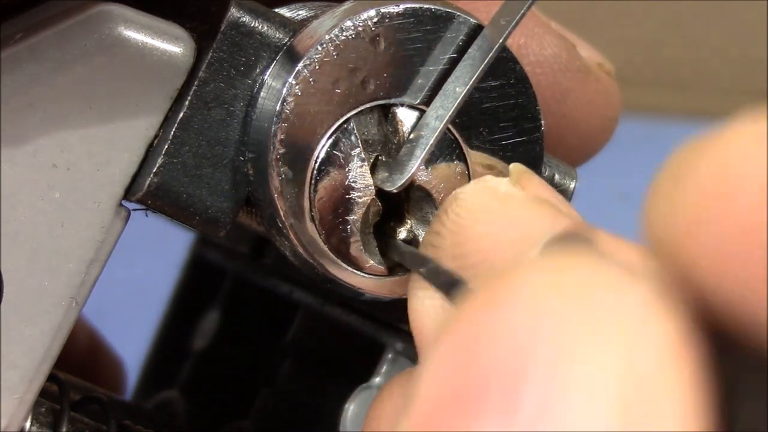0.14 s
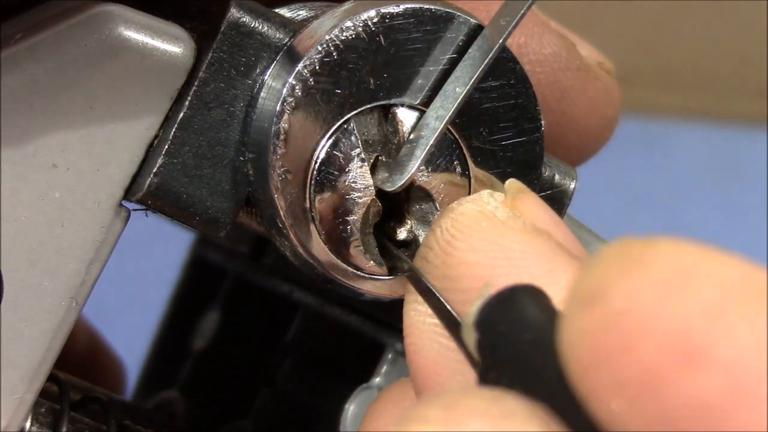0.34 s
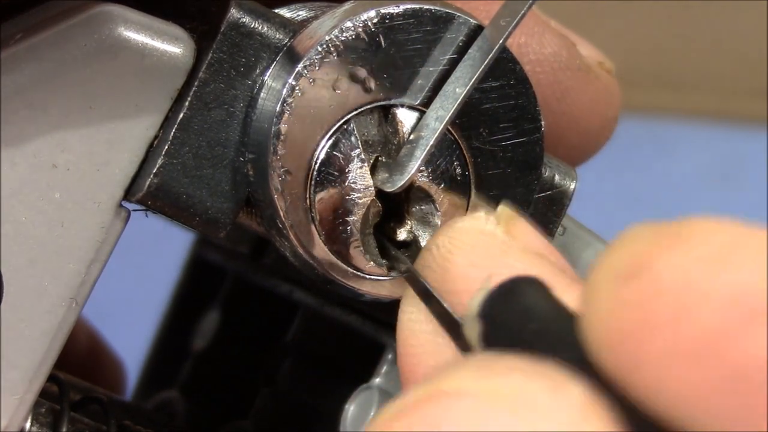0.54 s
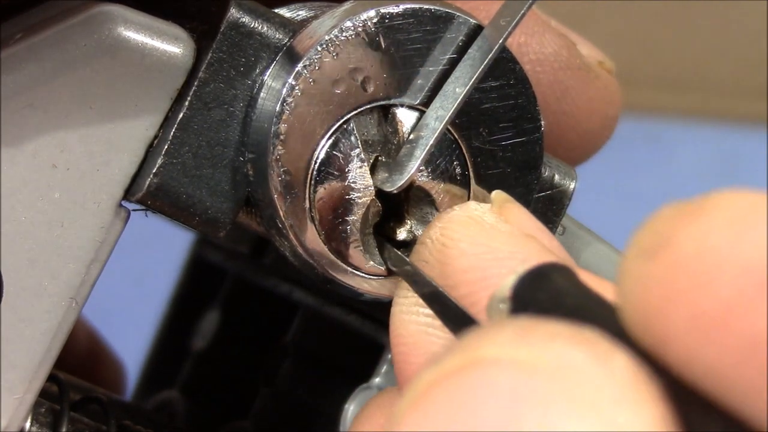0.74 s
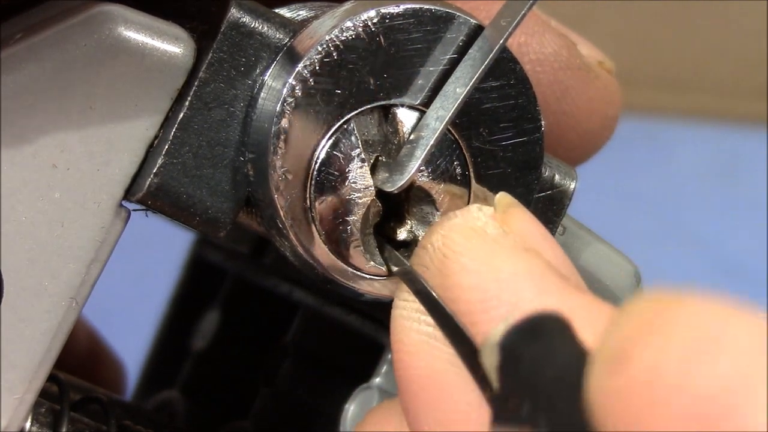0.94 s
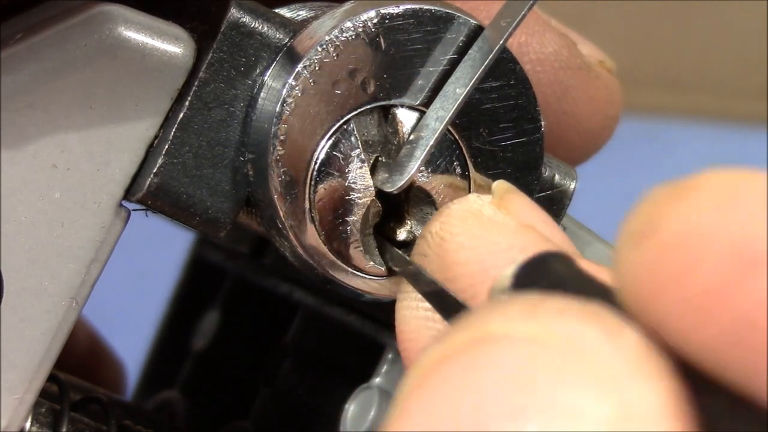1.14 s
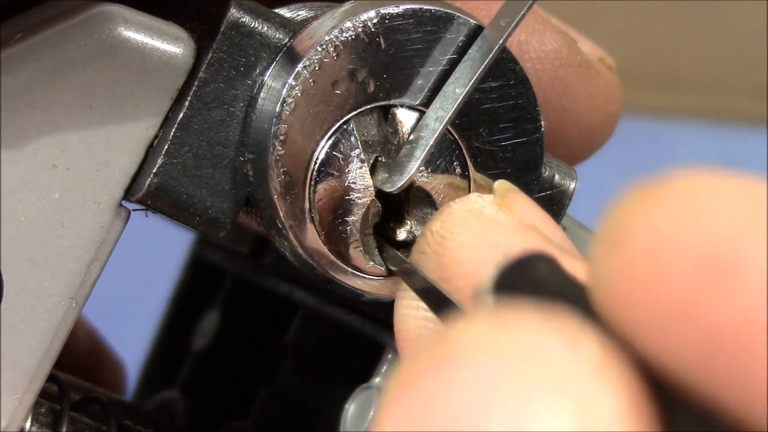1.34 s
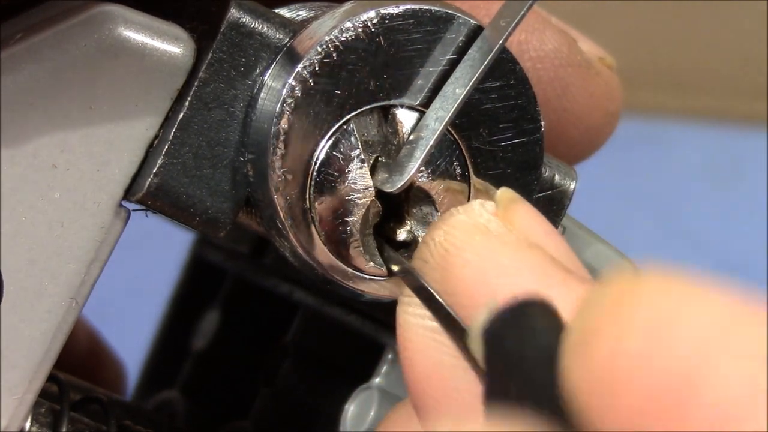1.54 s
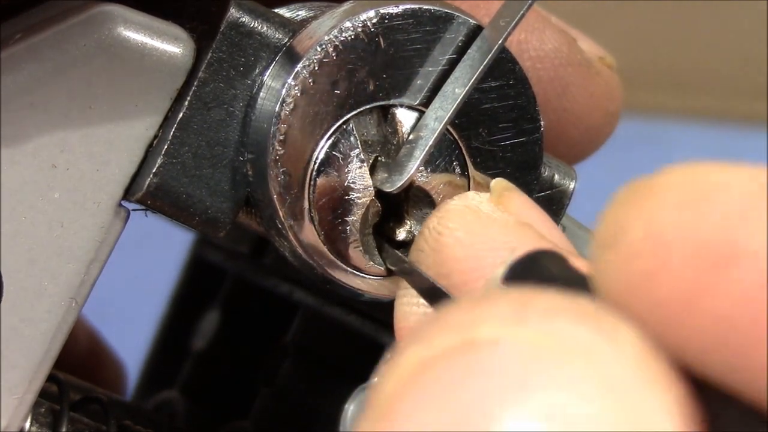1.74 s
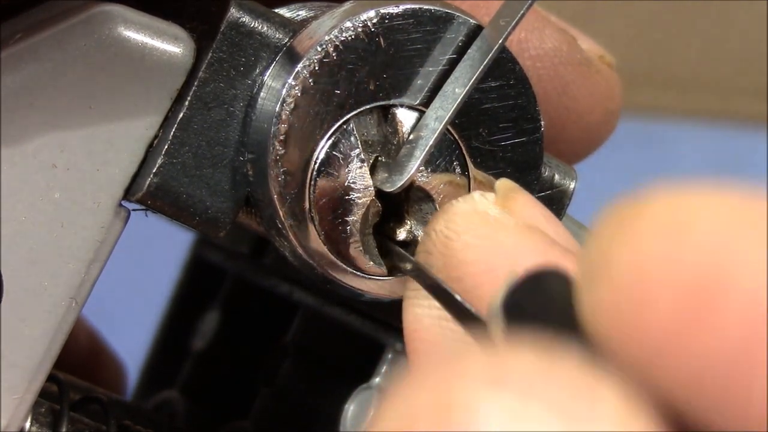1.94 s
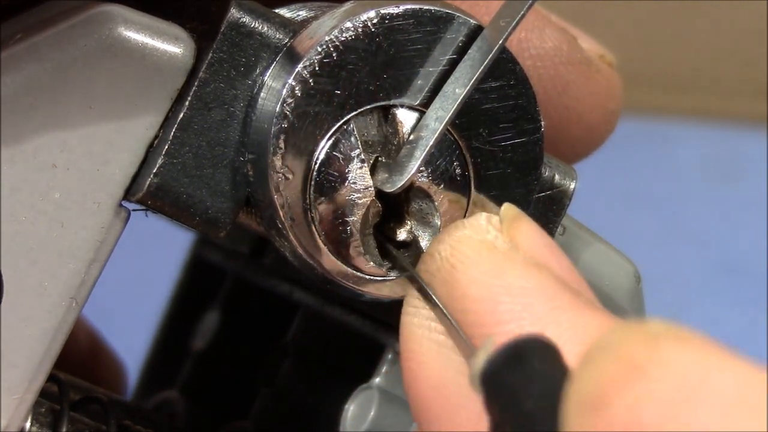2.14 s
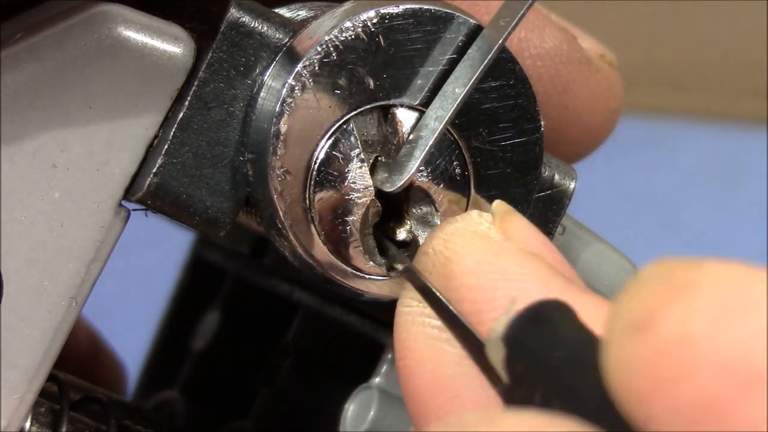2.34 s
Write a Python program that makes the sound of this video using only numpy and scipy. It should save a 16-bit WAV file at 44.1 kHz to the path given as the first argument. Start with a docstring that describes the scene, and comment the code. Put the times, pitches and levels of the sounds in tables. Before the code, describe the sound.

Lock picking, heard very close in a small quiet room. Tiny ticks lead to a loud, bright metallic snap at 0.2 s. Lighter clicks follow at 0.45 and 0.56 s, then faint ones around 1.1-1.25 s and 1.9 s. Two hard clicks strike at 2.1 s, trailed by faint ticks. Soft vise thumps, short room tails, an early fading wash and faint steady hum lie underneath.

```python
"""From the start a faint mains hum, soft room noise and low rumble lie under a wash that dies away.
Then a thin steel pick clicks over the pins of a lock held in a vise, close to a camera in a small room.
Each click is a damped tick of pick and pin with a sharp edge, and a modal knock in the lock body.
Low modes of the vise thump under hard clicks and under the fingers.
After each blow the room answers with a decaying stereo noise tail."""
import sys
import numpy as np
from scipy import signal
from scipy.fft import rfft, irfft, next_fast_len
from scipy.io import wavfile

SR = 44100
rng = np.random.default_rng(int(sys.argv[2]) if len(sys.argv) > 2 else 0)


def output_pcm(signal):
    """Save a mono or channel-first signal as 16-bit PCM at the path in sys.argv[1].

    Samples are clipped to [-1, 1] before scaling.
    """
    pcm = np.clip(np.atleast_2d(signal).T, -1, 1) * 32767
    wavfile.write(sys.argv[1], SR, np.round(pcm).astype(np.int16))


def ratio_of_db(decibels):
    """Turn decibels (scalar or array-like) into linear amplitude factors; 0 dB maps to 1."""
    return 10 ** (np.asarray(decibels, float) / 20)


N = 105840


def unit(x):
    """Normalization: scale a signal to rms 1."""
    return x / np.sqrt(np.mean(x ** 2) + 1e-20)


def along(points, hz):
    """Logarithmic interpolation: read a (f/Hz, value) curve on a log frequency axis."""
    f, value = np.transpose(points)
    return np.interp(np.log(hz + 1), np.log(f + 1), value)


def filtered(x, response):
    """Linear filtering: multiply the spectrum of x by a response of frequency."""
    m = next_fast_len(x.shape[-1] + SR // 4)  # padded against wrap-around
    spectrum = rfft(x, m) * response(np.fft.rfftfreq(m, 1 / SR))
    return irfft(spectrum, m)[..., :x.shape[-1]]


def stereo_noise(spectrum, alike):
    """Interchannel coherence: shaped mid and side noise, mixed for a given likeness, at rms 1."""
    def mid_side_response(hz):
        angle = np.arccos(np.clip(along(alike, hz), -1, 1)) / 2
        return ratio_of_db(along(spectrum, hz)) * [np.cos(angle), np.sin(angle)]

    mid, side = filtered(rng.standard_normal((2, N)), mid_side_response)
    return unit(np.array([mid + side, mid - side]))


# mains harmonics: f/Hz, rms level/dB
HUM_TONES = [(100, -71.5), (200, -78)]


def hum():
    """Harmonic series: steady sines at multiples of the mains frequency, in random phase."""
    t = np.arange(N) / SR
    tones = [np.sqrt(2) * ratio_of_db(db) * np.sin(2 * np.pi * (hz * t + rng.random())) for hz, db in HUM_TONES]
    return sum(tones)


# spectrum of the soft room noise: f/Hz, relative density level/dB per Hz
AIR_SPECTRUM = [(60, -61.5), (110, -2.5), (140, -7), (190, -4.5), (300, -5), (800, -10), (1500, -16),
                (4300, -22), (9000, -29), (12500, -35), (13500, -35), (15500, -51.5), (16300, -73.5),
                (22000, -120)]
# coherence of the soft room noise: f/Hz, left-right likeness
AIR_ALIKE = [(60, 0.67), (180, 0.78), (550, 0.38), (1650, 0.68), (4970, 0.69), (15000, 0.76)]
AIR_DB = -67.5  # rms


def air():
    """Stationary random noise: a fixed spectrum with partly coherent channels."""
    return ratio_of_db(AIR_DB) * stereo_noise(AIR_SPECTRUM, AIR_ALIKE)


# spectrum of the low rumble: f/Hz, relative density level/dB per Hz
RUMBLE_SPECTRUM = [(15, -14), (40, -5), (80, -3.5), (115, 0.5), (140, -21.5), (200, -85)]
RUMBLE_DB = -88  # rms


def rumble():
    """Low-frequency random noise: most of its power lies near and below 115 Hz."""
    return ratio_of_db(RUMBLE_DB) * stereo_noise(RUMBLE_SPECTRUM, [(30, .5), (100, 0.56)])


# spectrum of the wash: f/Hz, relative density level/dB per Hz
WASH_SPECTRUM = [(80, -42.5), (150, 0.5), (250, 2.5), (400, 2), (900, -3), (1300, -4.5), (12000, -28.5),
                 (15600, -52.5), (22000, -120)]
WASH_DB, WASH_T60_S = -60.5, 1.2  # level before the decay, decay time


def wash():
    """Exponential decay: shaped noise whose level falls linearly in dB from the start."""
    t = np.arange(N) / SR
    return ratio_of_db(WASH_DB - 60 * t / WASH_T60_S) * stereo_noise(WASH_SPECTRUM, [(100, .8)])


SCATTER_DB, PHASE_SCATTER_RAD = 1.5, .7  # standard deviations from blow to blow


def ring(modes, t, rise_s):
    """Modal superposition: damped sines with a short rise, excited a little differently by each blow."""
    hz, db, t60 = np.transpose(modes)[:, :, None]
    luck = rng.standard_normal((len(hz), 2))
    level = db + SCATTER_DB * luck[:, :1] - 60 * t / t60
    phase = PHASE_SCATTER_RAD * luck[:, 1:]
    waves = ratio_of_db(level) * np.sin(2 * np.pi * hz * t + phase)
    return waves.sum(0) * (1 - np.exp(-t / rise_s))


TICK_RISE_S = .00015
TICK_BEND = 1.3  # above 1 the tick holds a few cycles, then drops


def tick(t, hz, t60):
    """Damped oscillation: one sine of pick and pin with a fast rise and a bent decay."""
    swell = 1 - np.exp(-t / TICK_RISE_S)
    return 1.6 * swell * ratio_of_db(-60 * (t / t60) ** TICK_BEND) * np.sin(2 * np.pi * hz * t)


# upper ring of the pick: f/Hz, relative level/dB, t60/s
PICK_MODES = [(5050, -22, 0.0097), (5900, -21.5, 0.016), (7600, -25, 0.01459), (9500, -11, 0.0047),
              (10070, -20.5, .006), (11296, -23, 0.0055), (14300, -24.5, .004), (15400, -15.5, 0.0036)]
CRACK_DB, CRACK_T60_S = -8, .004
CRACK_BAND_HZ = [3230, 13500]


def sharp_edge(t):
    """Broadband impact excitation: upper modes of the pick with a short crack of noise."""
    high = signal.butter(2, CRACK_BAND_HZ, "band", fs=SR, output="sos")
    noise = signal.sosfilt(high, rng.standard_normal(len(t)))
    crack = ratio_of_db(CRACK_DB - 60 * t / CRACK_T60_S) * noise
    return ring(PICK_MODES, t, .0001) + crack


# modes of the lock body: f/Hz, relative level/dB, t60/s
BODY_MODES = [(480, -7, .03), (690, -8, .03), (990, -2, .024), (1125, -3, .026), (1375, -11, .035),
              (1850, -5, .02), (2350, -3, .022), (3290, -3, .016), (3900, -8, .015), (4550, -7, .012)]
BODY_RISE_S = .0006
KNOCK_FALL_DB = 3.5  # loss of a body mode one octave off the centre
RATTLE_DB, RATTLE_T60_S = 2, 0.013
RATTLE_OCTAVES = .8  # reach of the noise band to either side of the centre


def knock(t, centre_hz):
    """Selective modal excitation: body modes near a centre dominate, with rattling noise around it."""
    body = [(hz, db - KNOCK_FALL_DB * np.log2(hz / centre_hz) ** 2, t60) for hz, db, t60 in BODY_MODES]
    edges_hz = centre_hz * 2. ** (RATTLE_OCTAVES * np.array([-1, 1]))
    band = signal.butter(2, edges_hz, "band", fs=SR, output="sos")
    noise = unit(signal.sosfilt(band, rng.standard_normal(len(t))))
    rise = 1 - np.exp(-t / BODY_RISE_S)
    rattle = ratio_of_db(RATTLE_DB - 60 * t / RATTLE_T60_S) * rise * noise
    return ring(body, t, BODY_RISE_S) + rattle


# clicks of the pick on the pins: t/s, tick level/dB, tick f/Hz, tick t60/s,
# sharp edge against the tick level/dB, knock level/dB, knock centre f/Hz
PIN_CLICKS = [(0.1142, -47, 7450, .003, 2, -58, 3000), (0.1779, -41, 6980, 0.0014, 0, -50.5, 2514),
              (0.1865, -48.5, 7500, .002, 5.5, -55, 2300), (.2055, 0.5, 6870, 0.0022, -2, -25.5, 1160),
              (0.4493, -34, 7400, 0.0011, -15, -43.5, 2480), (.5595, -25.5, 7550, 0.0011, 3, -32.5, 1400),
              (.5786, -39, 6570, 0.0021, 2.5, -52.5, 4410), (1.0721, -30.5, 7230, 0.0018, -4, -51, 4020),
              (1.0829, -57.5, 6000, .002, -2, -65.5, 4000), (1.1981, -34.5, 8400, .0015, 8, -45.5, 2160),
              (1.2533, -48, 9700, 0.0015, 0, -50.5, 1730), (1.9, -42.5, 7560, 0.0013, 1.5, -76.5, 2978),
              (1.9008, -57.5, 4010, 0.0023, -5, -47.5, 2130), (2.1050, -10, 6600, 0.00092, -4.5, -25, 1570),
              (2.1289, -1.5, 6490, 0.001, -4.5, -29, 2640), (2.1790, -51, 7500, 0.0023, 1, -65, 3270),
              (2.217, -66, 6000, .002, -3.5, -56.5, 1790), (2.2890, -42, 6000, 0.0017, -8.5, -57, 1880),
              (2.325, -61, 7000, 0.0025, 9.5, -66, 3000)]


def clicks(t):
    """Coupled bodies: one impact sounds pick and lock, each click in its own mix."""
    blows = []
    for s, tick_db, tick_hz, tick_t60, edge_db, knock_db, centre_hz in PIN_CLICKS:
        pick = tick(t, tick_hz, tick_t60) + ratio_of_db(edge_db) * sharp_edge(t)
        blows.append((s, ratio_of_db(tick_db) * pick + ratio_of_db(knock_db) * knock(t, centre_hz)))
    return blows


# modes of the vise: f/Hz, relative level/dB, t60/s
VISE_MODES = [(123.27, -7, 0.029), (155, -4, 0.035), (205, 0, .055), (235, 3, 0.046), (335, 0, 0.037),
              (425, -7, 0.032)]
# shakes of the vise under hard clicks and under the fingers: t/s, level/dB, rise/s
VISE_THUMPS = [(.12, -49, .01), (.206, -37.5, 0.0037), (0.477, -58, .01), (0.559, -51, 0.0021),
               (0.577, -53, .004), (1.073, -60, 0.0032), (1.106, -55, 0.007), (1.199, -54, 0.002),
               (1.254, -56.5, .003), (1.524, -47.5, .01), (1.545, -56.5, 0.004), (1.589, -65.5, 0.0088),
               (1.901, -59, 0.001), (2.107, -36.5, 0.0031), (2.1305, -35, .003), (2.188, -53, 0.011),
               (2.29, -57, 0.0015)]


def thumps(t):
    """Low modal response: the vise rings down after each shake, with its own rise time."""
    return [(s, ratio_of_db(db) * ring(VISE_MODES, t, rise_s)) for s, db, rise_s in VISE_THUMPS]


# decay of the room: f/Hz, t60/s
ROOM_DECAY = [(150, 0.6), (400, 0.74), (1000, 0.51), (2800, 0.21), (7300, 0.14), (15000, 0.22)]
# colour of the room: f/Hz, relative level/dB
ROOM_COLOUR = [(200, -2), (700, 2), (1200, 0), (4000, 1), (7000, -1), (10000, -4), (12000, -2),
               (15000, -10)]
ROOM_DB, ROOM_GAP_S, ROOM_ALIKE = -18, .003, .8  # tail level, delay, left-right likeness


def room(x):
    """Reverberation: convolution with a fresh noise tail in which each frequency dies at its own speed."""
    hz, t, z = signal.stft(rng.standard_normal((2, SR // 2)), SR, nperseg=256)
    decay_db = 60 * t / along(ROOM_DECAY, hz)[:, None]
    z = z * ratio_of_db(along(ROOM_COLOUR, hz)[:, None] - decay_db)
    mid, side = signal.istft(z, SR, nperseg=256)[1]
    angle = np.arccos(ROOM_ALIKE) / 2
    tail = np.cos(angle) * mid + np.sin(angle) * np.array([side, -side])
    late = np.pad(x, (round(ROOM_GAP_S * SR), 0))[None]
    return ratio_of_db(ROOM_DB) * signal.fftconvolve(late, tail / np.linalg.norm(mid), axes=1)


# level difference of the direct sound: f/Hz, left over right level/dB
LEFT_OVER_RIGHT = [(200, -0.5), (600, 1.5), (1500, -0.46), (5000, 1.3), (9000, -2), (14000, -2.5)]
# phase difference of the direct sound: f/Hz, lead of the left/rad
LEFT_LEAD = [(200, 0.02), (600, 0.512), (1500, 0.3), (5000, 0), (9000, -.5), (14000, -.2)]


def stereo_direct(near):
    """Interchannel differences: level and phase are split evenly between left and right."""
    def ports(hz):
        left_to_right = ratio_of_db(along(LEFT_OVER_RIGHT, hz)) * np.exp(1j * along(LEFT_LEAD, hz))
        return left_to_right ** np.array([[.5], [-.5]])

    return filtered(near, ports)


def add(out, s, x):
    """Superposition: mix x into out from time s."""
    part = out[..., round(s * SR):][..., :x.shape[-1]]
    part += x[..., :part.shape[-1]]


MIC_LOW_HZ = 82.67


def picking():
    """Direct and reverberant fields: all blows and their room tails, through a high-pass."""
    near, far, t = np.zeros(N), np.zeros((2, N)), np.arange(SR // 8) / SR
    for s, blow in clicks(t) + thumps(t):
        add(near, s, blow)
        add(far, s, room(blow))
    high_pass = signal.butter(4, MIC_LOW_HZ, "high", fs=SR, output="sos")
    return signal.sosfilt(high_pass, stereo_direct(near) + far)


def scene():
    """Superposition: the quiet room with pick, lock and vise over it."""
    return hum() + air() + rumble() + wash() + picking()


TOP_HZ = 17300


def record(dry):
    """Clipping, band limitation and quantization: the camera limits the peaks and treble and stores 16 bits."""
    low_pass = signal.cheby2(10, 70, TOP_HZ, fs=SR, output="sos")
    limited = signal.sosfilt(low_pass, np.clip(dry, -1, 1))
    return np.clip(np.round(limited * 2 ** 15) / 2 ** 15, -1, 1)


dry = scene()
out = record(dry)
output_pcm(out)
```